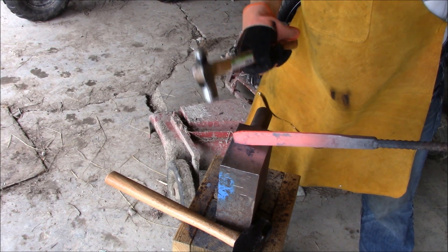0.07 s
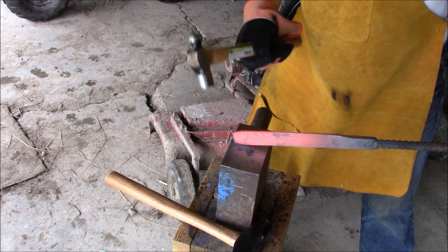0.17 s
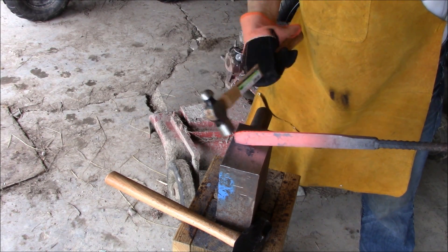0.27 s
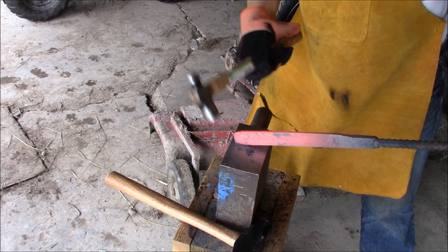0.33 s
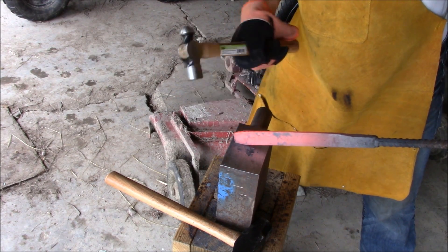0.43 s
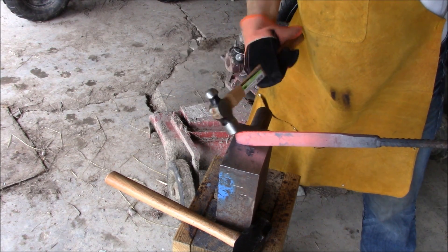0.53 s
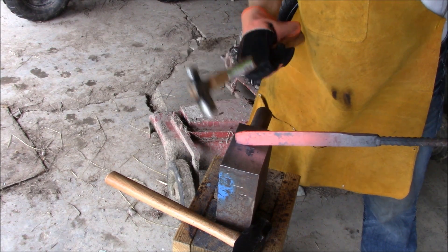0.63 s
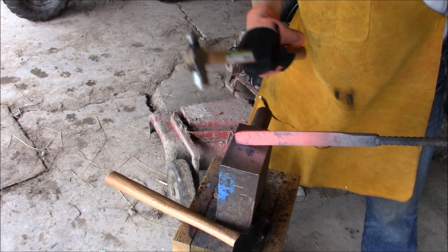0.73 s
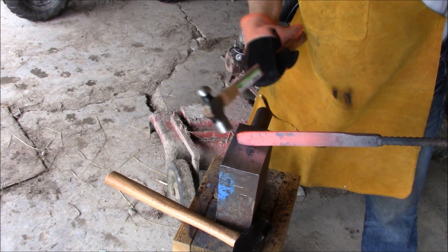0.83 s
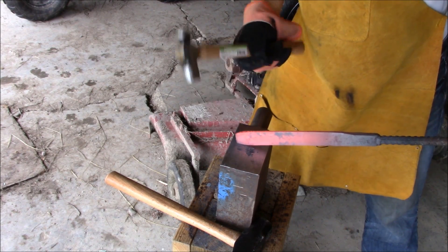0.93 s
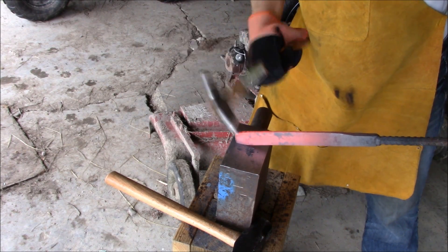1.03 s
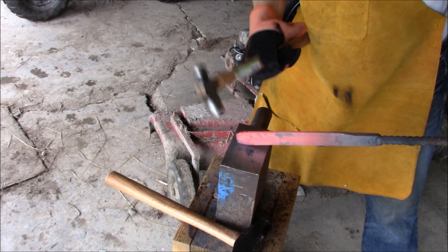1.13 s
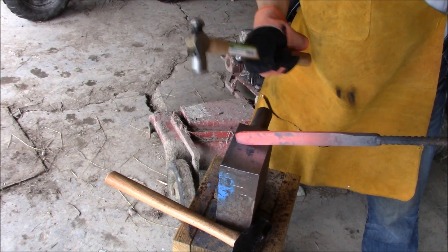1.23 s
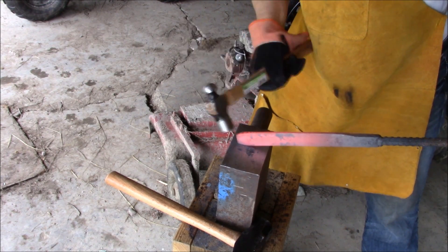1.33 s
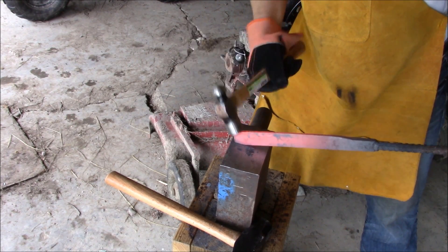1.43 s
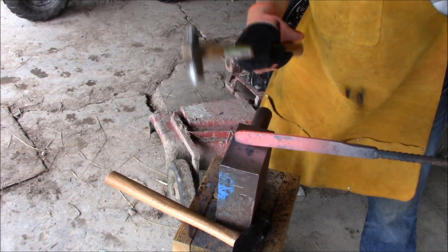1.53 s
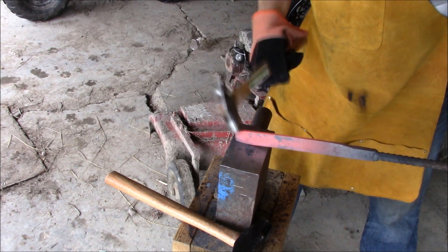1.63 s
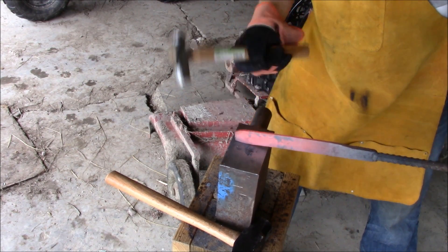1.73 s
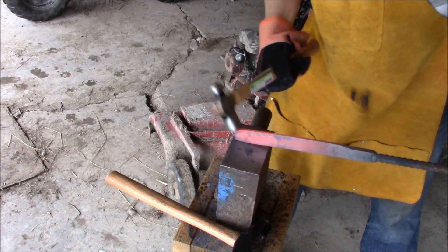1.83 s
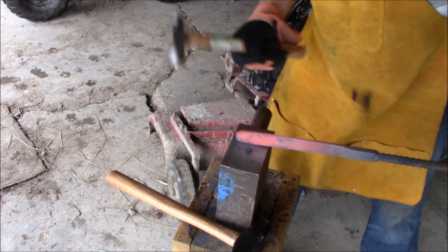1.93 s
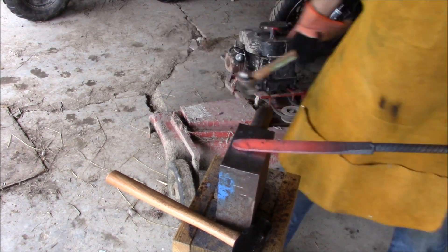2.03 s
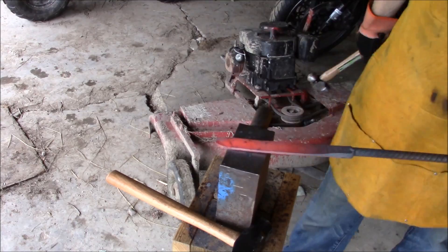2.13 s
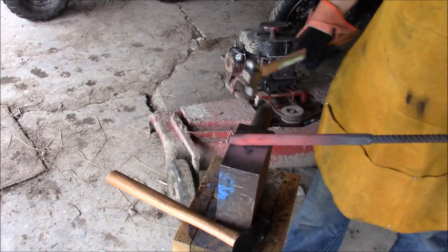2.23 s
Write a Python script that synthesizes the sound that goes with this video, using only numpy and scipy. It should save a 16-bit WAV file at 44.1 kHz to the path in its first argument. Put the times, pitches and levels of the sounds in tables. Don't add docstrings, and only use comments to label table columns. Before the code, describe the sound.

A hand hammer strikes hot steel on an anvil: five hard, bright, evenly spaced blows in a concrete workshop, a tiny silence, then eight sped-up, high-pitched blows and faint ticks with a scrape; close, nearly mono microphone.

```python
import sys
import numpy as np
from scipy import signal
from scipy.fft import rfft, irfft, next_fast_len
from scipy.io import wavfile
from scipy.ndimage import uniform_filter1d, map_coordinates

SR = 44100
rng = np.random.default_rng(int(sys.argv[2]) if len(sys.argv) > 2 else 0)


def voltage_ratio(decibels):
    exponent = np.asarray(decibels, float) / 20
    return 10 ** exponent


def to_wav(sig):
    pcm = np.clip(np.atleast_2d(sig), -1, 1) * 32767
    pcm = np.round(pcm).astype(np.int16)
    wavfile.write(sys.argv[1], SR, pcm.T)


N = 101430
SPEED = 4
GAP_START_S, GAP_END_S = 1.4592, 1.4922
LATE_S = 0.00078


def unit(x):
    return x / np.sqrt(np.mean(x ** 2) + 1e-20)


def along(points, hz):
    f, value = np.transpose(points)
    return np.interp(np.log(hz + 1), np.log(f + 1), value)


def colour(x, points, tilt_db=0):
    length = x.shape[-1]
    padded = next_fast_len(length + 4096)
    hz = np.fft.rfftfreq(padded, 1 / SR)
    curve_db = along(points, hz) + tilt_db * np.log2((hz + 300) / 2300) / 2
    return irfft(rfft(x, padded) * voltage_ratio(curve_db), padded)[..., :length]


def soft_ceiling(x, ceiling):
    return x / (1 + (x / ceiling) ** 4) ** (1 / 4)


def crack(noise, bright_db, t):
    # frequency in Hz, level in dB per Hz.
    crack_colour = [(88, -48), (150, -17.5), (934, 5.5), (4510, -10.5), (5820, -7), (10900, -10.5),
                    (16500, -46.5)]
    decay = voltage_ratio(-60 * t / 0.015) + 0.91 * voltage_ratio(-60 * t / 0.014)
    rise = 1 - np.exp(-t / 0.00027)
    return unit(colour(noise[:, ::-1], crack_colour, bright_db)) * voltage_ratio(-5) * decay * rise


def ring(modes, t, smear_hz, clean, build_s):
    longest_s = 0.42
    out = np.zeros(len(t))
    for hz, db, t60 in modes:
        sway = [map_coordinates(k, [t * smear_hz]) for k in rng.standard_normal((2, 128))]
        phase = 2 * np.pi * hz * t
        fade = voltage_ratio(db + rng.normal(0, 2.6) - 60 * t / min(t60, longest_s))
        out += fade * ((clean + sway[0]) * np.sin(phase) + sway[1] * np.cos(phase))
    return out * (1 - np.exp(-t / build_s))


def stump(t):
    # frequency in Hz, level in dB, t60 in seconds.
    stump_modes = [(104.7, -17, .45), (154.5, -14.5, .45), (188.5, -3, 0.28), (247.6, -6.5, .42),
                   (299, -9, 0.3), (338.6, -5.5, .3), (423.6, -16, 0.32), (477, -8.5, 0.23),
                   (693, -15.5, 0.33), (731, -17, 0.42), (803.6, -14.5, 0.37), (1031, -25, 0.39),
                   (1029.3, -7.5, 0.37), (1165, -14, 0.46)]
    return voltage_ratio(-15.5) * ring(stump_modes, t, smear_hz=30, clean=1.3, build_s=0.019)


def tinted(noise, modes):
    lift_db, half_width_hz = 7, 110
    hz = np.fft.rfftfreq(noise.shape[1], 1 / SR)
    peaks = sum(1 / (1 + ((hz - centre) / half_width_hz) ** 2) for centre, *_ in modes)
    return irfft(rfft(noise) * (1 + voltage_ratio(lift_db) * peaks), noise.shape[1])


def tail(noise, spectrum, tilt_db):
    # frequency in Hz, t60 in seconds.
    shop_t60 = [(60, 0.97), (250, 0.61), (1000, 0.42), (3000, 0.38), (8000, .3), (15000, .2)]
    hz, s, z = signal.stft(unit(colour(noise, spectrum, tilt_db)), SR, nperseg=256)
    fade = voltage_ratio(-60 * s / along(shop_t60, hz)[:, None])
    return signal.istft(z * fade, SR, nperseg=256)[1][:, :noise.shape[1]]


def room_answer(noise, anvil, bright_db, t):
    # frequency in Hz, level in dB per Hz.
    thud = [(40, -54), (90, -27), (250, 0.5), (500, -1.5), (1000, 5), (2500, -10), (6000, -12.5),
            (12000, -19), (16500, -35)]
    return tail(tinted(noise, anvil), thud, bright_db) * voltage_ratio(-7) * (1 - np.exp(-t / 0.0014))


def blows(rows, anvil, size):
    # frequency in Hz, level in dB.
    same = [(100, 0), (1000, -1), (4000, -9)]
    fresh = [(100, -14), (1000, -7), (4000, -.5)]
    duck_db, duck_s, recover_s = 9, 0.013, 0.046
    out, duck = np.zeros((2, size + SR)), np.zeros(size + SR)
    t = np.arange(SR * 3 // 4) / SR
    walls = colour(rng.standard_normal((2, len(t))), same)
    stand = stump(t)
    for s, db, bright_db, ring_db in rows:
        noise = walls + colour(rng.standard_normal((2, len(t))), fresh)
        strike = crack(noise, bright_db, t)
        room = room_answer(noise, anvil, bright_db, t)
        steel = voltage_ratio(ring_db - 19.5) * ring(anvil, t, smear_hz=100, clean=0.5, build_s=0.00017)
        steel_pair = [steel, np.roll(steel, SR // 100)]
        i = max(round(s * SR), 0)
        out[:, i:i + len(t)] += voltage_ratio(db) * (strike + room + stand + steel_pair)
        duck[i:i + len(t)] = np.clip(t / duck_s, 0, 1) * np.clip(1 - t / recover_s, 0, 1)
    return out[:, :size], voltage_ratio(-duck_db * duck[:size])


def shift(size):
    # start in seconds, level in dB, centre in Hz, as heard sped up.
    ticks = [
        (2.0623, -39.5, 11900),
        (2.074, -45, 1390),
        (2.128, -47, 6000),
        (2.156, -46, 2500),
        (2.165, -37.5, 3470),
        (2.194, -42, 1850),
    ]
    # time in seconds, level in dB.
    scrape_level = [
        (2.12, -76),
        (2.135, -45),
        (2.155, -44),
        (2.172, -38.5),
        (2.19, -38),
        (2.22, -68),
        (2.26, -85),
        (2.3, -51),
    ]
    # frequency in Hz, level in dB per Hz.
    scrape_colour = [(60, -40), (130, -5), (250, 6), (800, 8.5), (2000, 5.5), (4000, -4)]
    out = np.zeros((2, size + SR))
    t = np.arange(size) / SR / SPEED + GAP_END_S
    length = SR // 2
    snap = 1 + 1.1 * voltage_ratio(-60 * np.arange(length) / SR / 0.02)
    for s, db, hz in ticks:
        c = hz / SPEED
        tick_colour = [(c / 5, -25), (c, 0), (c * 3, -10), (c * 12, -40)]
        knock = tail(rng.standard_normal((2, length)), tick_colour, 0)
        i = round((s - GAP_END_S) * SPEED * SR)
        out[:, i:][:, :length] += voltage_ratio(db) * knock * snap
    rubbing = rng.standard_normal((2, size))
    roughness_db = 2.8 * unit(uniform_filter1d(rng.standard_normal(size), size=200))
    grit = unit(colour(rubbing * voltage_ratio(roughness_db), scrape_colour))
    return out[:, :size] + grit * voltage_ratio(np.interp(t, *np.transpose(scrape_level)))


def stereo(pair, extra_db):
    # frequency in Hz, side over mid in dB.
    width = [(100, -36), (400, -30), (1200, -29), (2500, -19), (5000, -16.5), (10000, -14), (14000, -20)]
    side = colour(pair[1], width) * voltage_ratio(extra_db)
    return np.array([pair[0] + side, pair[0] - side])


def air(size, spectrum, db, side_db):
    mid, side = unit(colour(rng.standard_normal((2, size)), spectrum))
    return voltage_ratio(db) * (mid + voltage_ratio(side_db) * np.array([side, -side]))


def hum():
    # frequency in Hz, level in dB.
    hum_tones = [(645, -60), (565, -69), (813, -72)]
    t = np.arange(N) / SR
    return sum(voltage_ratio(db + 3) * np.sin(2 * np.pi * hz * t) for hz, db in hum_tones) * (t < 0.4)


def normal_speed():
    # start in seconds, peak in dB, brightness in dB, ring in dB.
    slow_blows = [
        (0.231, -9.5, -0.5, -0.5),
        (0.508, -6.5, 1, -0.5),
        (0.772, -5.5, 2, -6.5),
        (1.027, -6, 0, -2.5),
        (1.282, -5.5, 0.5, -2),
    ]
    # frequency in Hz, level in dB, t60 in seconds.
    hot_anvil = [(1924, -20, 0.1), (2500, 3.5, 0.14), (3105, -4, 0.45), (3950, -4.5, 0.37),
                 (4910, -8.5, 0.5), (6000, 4, .3), (7010, -0.5, 0.26), (7470, -12, 0.14),
                 (8200, -2.5, 0.15), (9460, 3, 0.092), (10420, -17, 0.083), (10870, -20.5, 0.083),
                 (12030, -36, 0.276), (13800, -30, .15)]
    # frequency in Hz, level in dB per Hz.
    slow_air = [(24, -60), (45, -14.5), (250, -14.5), (640, -16), (1100, -12.5), (2000, -28), (3000, -23.5),
                (4200, -33), (16000, -47)]
    hits, gain = blows(np.add(slow_blows, [LATE_S, 0, 0, 0]), hot_anvil, N)
    mix = stereo(hits, 0) + air(N, slow_air, -58.5, -8) + hum()
    return mix * gain * (np.arange(N) < GAP_START_S * SR)


def four_times_as_fast():
    # start in seconds, peak in dB, brightness in dB, ring in dB.
    fast_blows = [
        (1.51, -4, 0.5, 2.5),
        (1.579, -5, -5, -1.5),
        (1.646, -3.5, -1.5, 2),
        (1.711, -5, -3, 6.5),
        (1.779, -4, -4.5, 3.5),
        (1.845, -4.5, -6, 2),
        (1.91, -5, -3, 4),
        (1.975, -4.5, -4, 4.5),
    ]
    # frequency in Hz, level in dB, t60 in seconds.
    cool_anvil = [(1750, -25, 0.78), (2124, -29, 0.2), (2000, -32, 0.26), (2455, -0.5, 0.5),
                  (2640, -6.5, 0.52), (2996, 2, 0.56), (3350, -20, 0.45), (3200, -13, 0.7),
                  (3520, -29, 0.28)]
    # frequency in Hz, level in dB.
    fast_tone = [(40, 1), (120, -14.5), (250, -5.5), (380, 1), (20000, -4)]
    # frequency in Hz, level in dB per Hz.
    fast_air = [(24, -70), (80, -24.5), (200, -20), (640, -18), (1100, -17.5), (2000, -30), (3000, -29),
                (4200, -28), (16000, -60)]
    earlier_s = 1.4425
    length = N - round(GAP_END_S * SR)
    size = length * SPEED
    lead = round((GAP_END_S - earlier_s) * SPEED * SR)

    def faster(x):
        return colour(signal.resample_poly(x, 1, SPEED, axis=1)[:, :length], fast_tone)

    all_blows = [(earlier_s, *fast_blows[0][1:]), *fast_blows]
    rows = [((s + LATE_S - earlier_s) * SPEED, *rest) for s, *rest in all_blows]
    hits, gain = blows(rows, cool_anvil, size + lead)
    hits, gain = hits[:, lead:], gain[lead:]
    work = soft_ceiling(faster(hits * gain + shift(size)), 0.42)
    return stereo(work, -9.5) + faster(air(size, fast_air, -55.5, -11.5) * gain)


def scene():
    out = normal_speed()
    out[:, round(GAP_END_S * SR):] = four_times_as_fast()
    return out


def roll_off(x):
    return signal.sosfilt(signal.butter(12, 17000, fs=SR, output="sos"), x)


def record(dry):
    # frequency in Hz, level in dB.
    sound_band = [(20, -14), (45, -7), (90, 0), (15800, 0), (16300, -18), (17000, -30), (17200, -90)]
    side_kept_db, side_luck_db = -29.5, 6.5
    left, right = colour(soft_ceiling(dry, 0.56), sound_band)
    mid = (left + right) / 2
    z = signal.stft([mid, (left - right) / 2], nperseg=2048)[2]
    bands = np.abs(z[:, :1024]).reshape(2, 64, 16, -1).mean(axis=2)
    level = np.repeat(bands, 16, axis=1)
    luck_db = side_luck_db * np.repeat(rng.standard_normal(bands[0].shape), 16, axis=0)
    side_db = 20 * np.log10(level[1] / (level[0] + 1e-12) + 1e-9)
    kept = np.clip(side_db - side_kept_db + luck_db, 0, 1)
    side = signal.istft(np.pad(z[1, :1024] * kept, ((0, 1), (0, 0))), nperseg=2048)[1][:N]
    return roll_off(mid + np.array([side, -side]))


dry = scene()
out = record(dry)
to_wav(out)
```